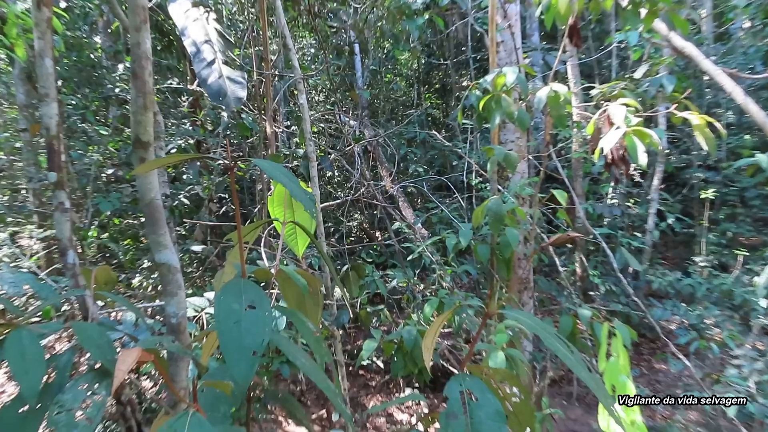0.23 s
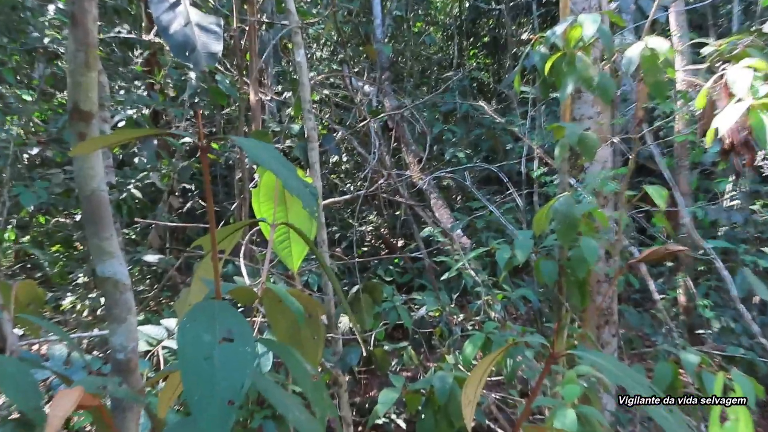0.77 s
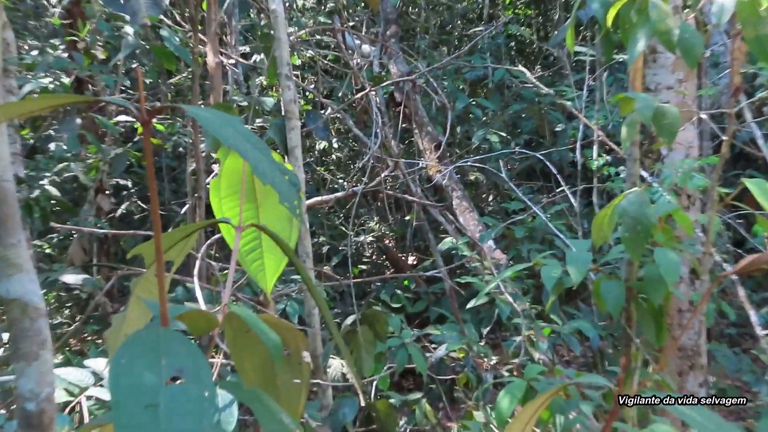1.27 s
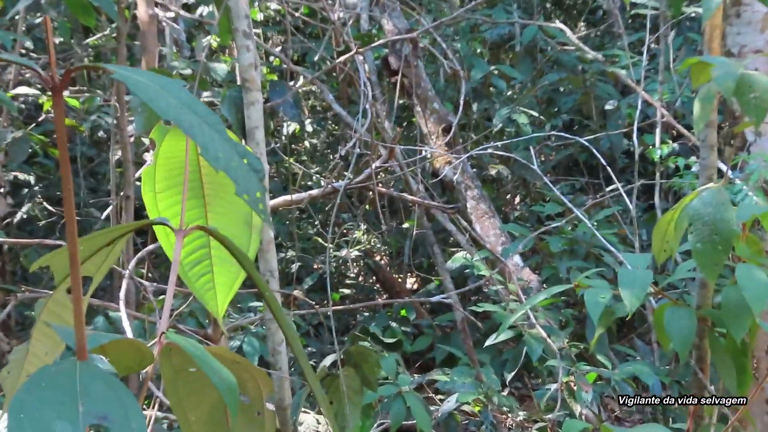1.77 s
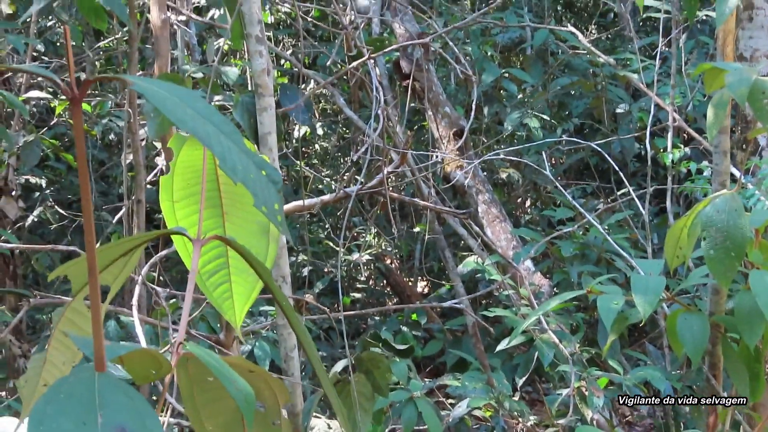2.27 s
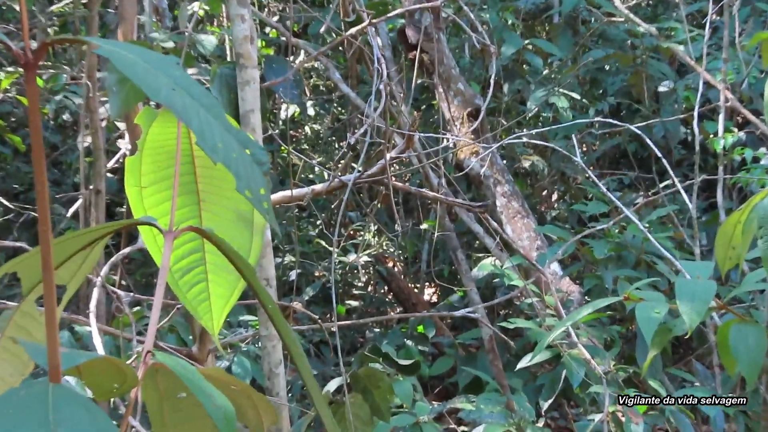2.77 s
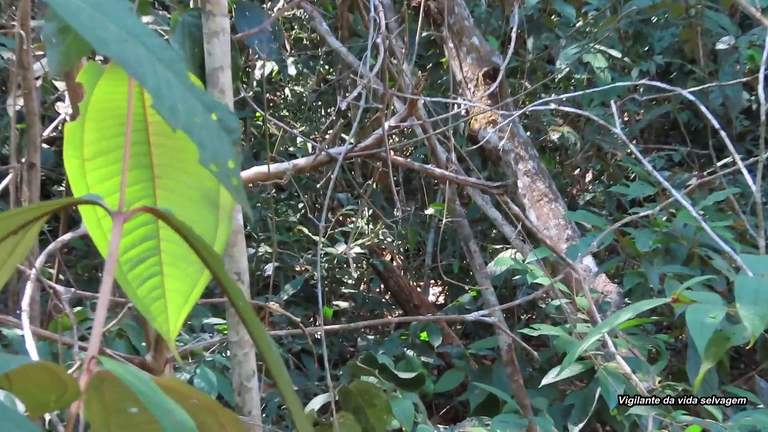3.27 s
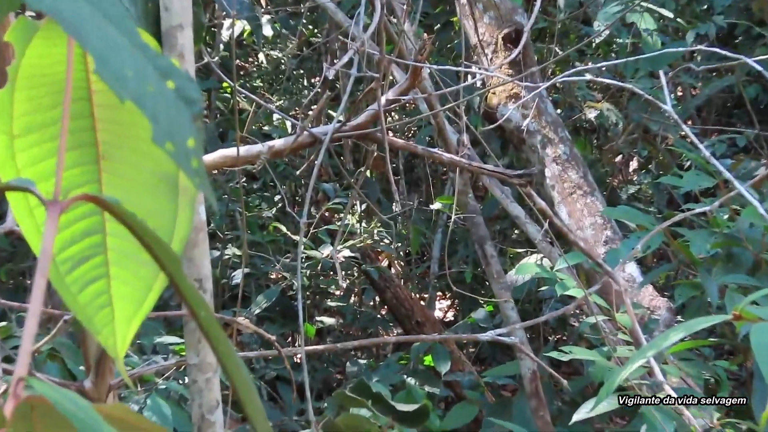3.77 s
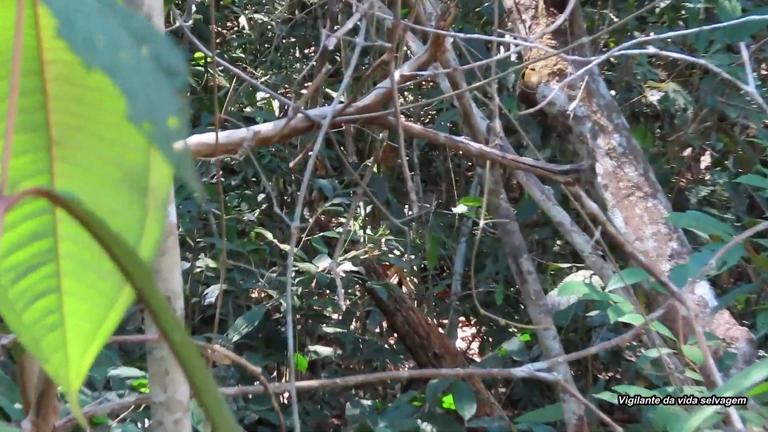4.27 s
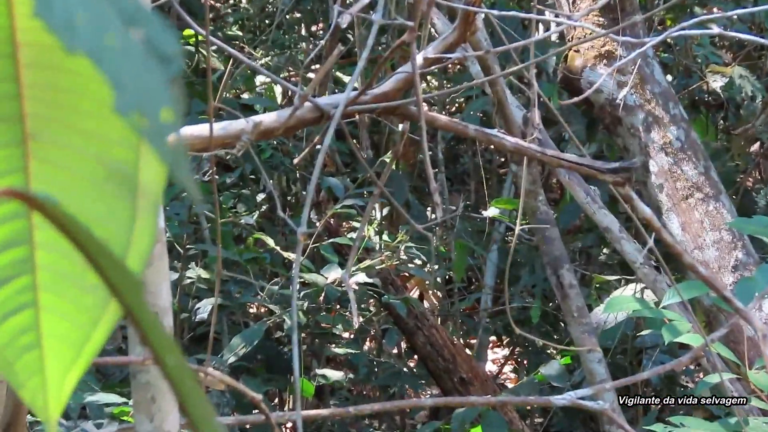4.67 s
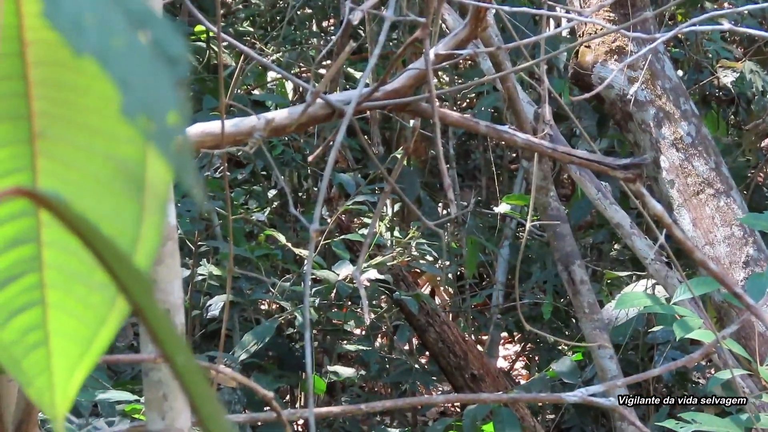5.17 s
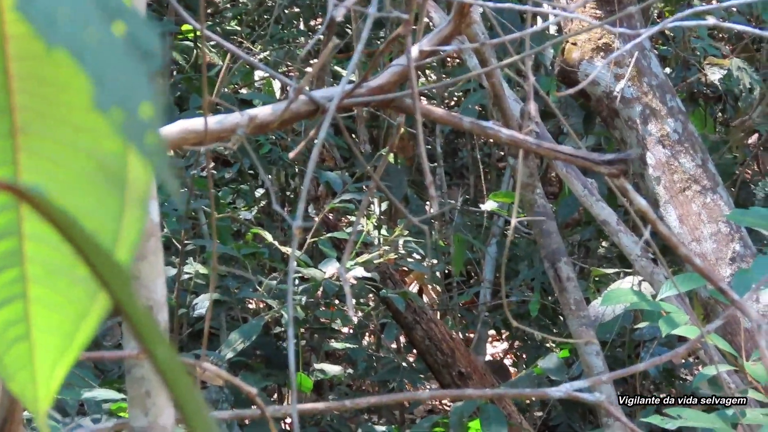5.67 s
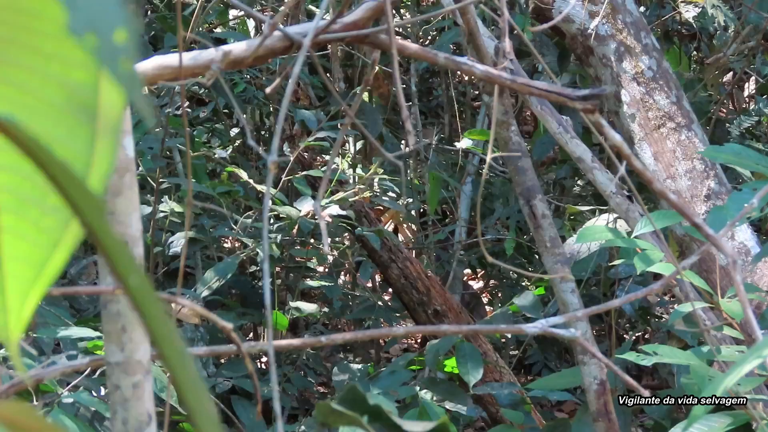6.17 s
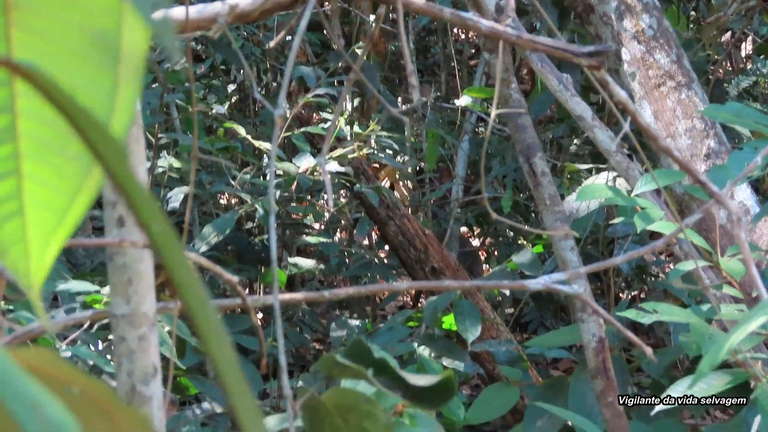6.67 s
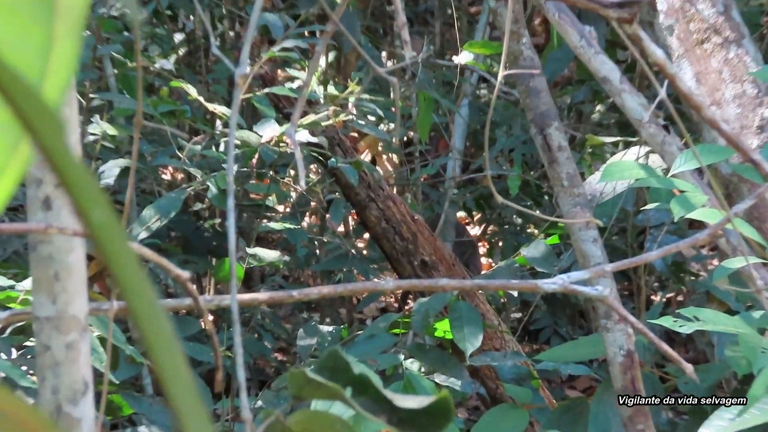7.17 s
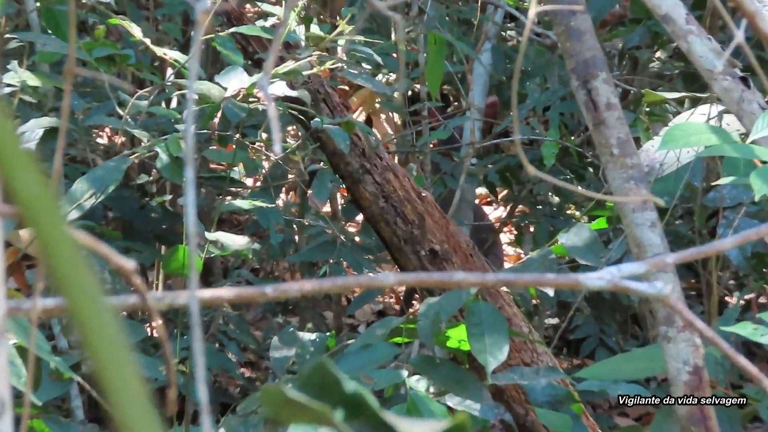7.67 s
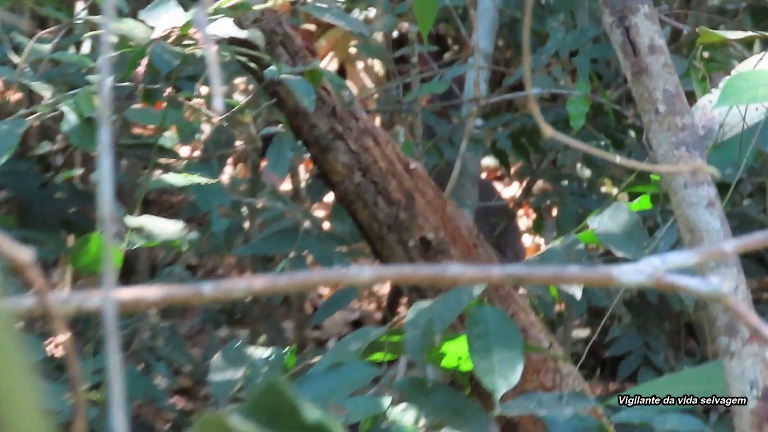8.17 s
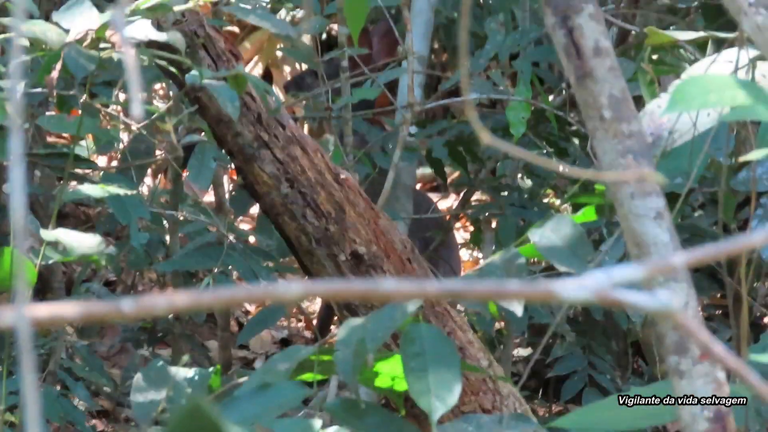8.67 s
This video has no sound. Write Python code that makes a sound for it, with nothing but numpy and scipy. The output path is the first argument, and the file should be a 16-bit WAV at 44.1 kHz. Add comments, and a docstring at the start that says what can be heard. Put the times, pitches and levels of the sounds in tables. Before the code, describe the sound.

Thin arched squeaks and short hoarse yaps from monkeys ring among trees, densest early, then sparser, with rustling foliage, insect shimmer and woody knocks.

```python
"""Spider monkeys call in a forest: thin, arched whistles, and sharp, falling chirps and yaps.
Whistles are near-sines with two overtones; the rougher calls are harmonics with unsteady phase.
Trunks throw the calls back and a few damped noise bursts knock on wood and leaves.
Leaf-like noise and ticks swell as rustle or as a dull, blurred echo of calls;
insects and a far bird sound over airy, low noise."""
import sys
import numpy as np
from scipy import signal
from scipy.fft import rfft, irfft, next_fast_len
from scipy.io import wavfile
from scipy.ndimage import uniform_filter1d

SR = 44100
rng = np.random.default_rng(int(sys.argv[2]) if len(sys.argv) > 2 else 0)


def to_wav(s):
    """Save 16-bit WAV."""
    ch = np.atleast_2d(s).T  # columns
    pcm = np.round(np.clip(ch, -1, 1) * 32767)  # PCM
    wavfile.write(sys.argv[1], SR, pcm.astype(np.int16))


N = 393372
EDGE_HZ = 15600  # upper band limit
CHIRP_MOUTH_HZ = 1197  # mouth resonance shared by chirps, squeals and yelps


def gain_of(db):
    """Decibels to amplitude."""
    return 10 ** (np.asarray(db) / 20)


def evened(x):
    """Scales to rms 1."""
    return x / np.sqrt(np.mean(x ** 2) + 1e-20)


def read(points, hz):
    """Reads a spectrum on a log-frequency axis."""
    f, value = np.transpose(points)
    return np.interp(np.log(hz + 1), np.log(f + 1), value)


def follow(rows, t):
    """Reads each column of a curve at the times t."""
    s, *columns = np.transpose(rows)
    return [np.interp(t, s, c) for c in columns]


def add(mix, s, sound):
    """Mixes a sound in at time s."""
    part = mix[max(round(s * SR), 0):][:len(sound)]
    part += sound[:len(part)]


def wander(size, rate_hz):
    """Chance drift around zero: straight lines between random knots, two knots per cycle of the rate."""
    knots = rng.standard_normal(8192)
    return 1.69 * np.interp(np.arange(size) * 2 * rate_hz / SR, np.arange(len(knots)), knots)


def fade(t, rise, fall):
    """Straight fade-in and fade-out, in seconds."""
    return np.clip((t - t[0]) / rise, 0, 1) * np.clip((t[-1] - t) / fall, 0, 1)


def noise(spectrum, patchy_db):
    """Stereo noise of a given colour, with patches that drift in time and frequency."""
    # left-right likeness: f/Hz, correlation (0-1)
    likeness = [(30, 0.66), (80, 0.96), (160, 0.51), (350, 0.14), (800, 0.93), (2000, 0.9), (5000, 0.92),
                (9000, 0.44), (15000, 0.39)]
    frames, hz = N // 256 + 5, np.fft.rfftfreq(1024, 1 / SR)
    a, b, c, d, patches = rng.standard_normal((5, frames, 513))
    patches = uniform_filter1d(patches, size=8, axis=0)
    patches = evened(uniform_filter1d(patches, size=14, axis=1))
    same = np.clip(read(likeness, hz), -1, 1)
    left = a + 1j * b
    right = same * left + np.sqrt(1 - same ** 2) * (c + 1j * d)
    z = np.array([left, right]) * gain_of(read(spectrum, hz) + patchy_db * patches)
    return evened(signal.istft(z.transpose(0, 2, 1), nperseg=1024, noverlap=768)[1][:, :N])


def air():
    """Steady, broad noise of the air, weighted to the lows."""
    # colour of the air: f/Hz, relative density/dB per Hz
    air_colour = [(12, -56), (20, 14.5), (85, 1.5), (109, 2), (180, 2.5), (282, -5), (324, -0.5), (404, 0),
                  (811, -2.5), (1500, -13.5), (2470, -8.5), (4070, -20), (6910, -26), (10500, -32),
                  (15500, -54)]
    return gain_of(-56.5) * noise(air_colour, patchy_db=4.0)


def rumble(t):
    """Low noise whose level rises and sinks."""
    # colour of the rumble: f/Hz, relative density/dB per Hz
    rumble_colour = [(30, -31), (70, -3), (120, -6), (250, -8), (450, -7.5), (560, -29.5), (1500, -56)]
    # course of the rumble: t/s, level/dB
    rumble_level = [(0, -46.5), (1.4, -47.5), (1.8, -41.5), (1.92, -51.5), (4.5, -49), (5.3, -52),
                    (6.2, -52.5), (7.2, -50), (7.7, -48), (8.9, -51.5)]
    return gain_of(follow(rumble_level, t)[0]) * noise(rumble_colour, patchy_db=2.5)


def swelling(t):
    """Levels in dB of leaf-like noise and dry hiss: each swell builds up, then settles to a faint stir."""
    # swells of leaf-like noise, some of them the dull, blurred echo of calls:
    # t/s at the height, settling time/s, leaf-like noise/dB, dry hiss/dB
    swells = [(2.22, .2, -41, -70), (2.51, 0.32, -39.5, -53), (3.625, 0.33, -43.5, -76),
              (4.303, .4, -51, -72), (4.925, 0.35, -42.5, -69), (5.681, 0.41, -43.5, -55),
              (5.93, 0.28, -41.5, -55), (6.102, 0.25, -44, -44.5), (6.39, 0.52, -43, -49.5),
              (6.732, 0.23, -43, -57), (7.557, 0.18, -42.5, -43.5), (8.118, 0.23, -45, -50),
              (8.338, 0.16, -44, -46.5), (8.6, 0.42, -42, -46)]
    rise_share = 0.71  # build-up time over settling time
    stir_db, dry_stir_db = -52, -64  # the stir between swells
    rustle, dry_hiss = gain_of(stir_db) ** 2, gain_of(dry_stir_db) ** 2
    for s, length, rustle_db, dry_db in swells:
        u = (t - s) / length
        power = np.exp(-2 * np.where(u < 0, (u / rise_share) ** 2, u))
        rustle = rustle + gain_of(rustle_db) ** 2 * power
        dry_hiss = dry_hiss + gain_of(dry_db) ** 2 * power
    return 10 * np.log10(rustle), 10 * np.log10(dry_hiss)


def leaf_noise(rustle_db, ticks_per_s=130, spread_db=1.0, ticks_db=-10):
    """Leaf-like rustle: a coloured noise wash with fine ticks of decaying noise."""
    # colour of the leaf-like noise: f/Hz, relative density/dB per Hz
    leaf_colour = [(120, -32), (200, -4.5), (330, -5), (520, -5), (700, -1), (900, -0.5), (1400, -2),
                   (2200, -4.5), (3400, -3.5), (5000, -7.5), (7000, -11.5), (11000, -24.5), (15500, -32.5)]
    strength_db = spread_db * np.minimum(rng.exponential(1, (2, N)), 4)
    clicks = (rng.random((2, N)) < ticks_per_s / SR) * gain_of(strength_db)
    clicks = clicks + .5 * clicks[::-1]  # each side also reaches the other ear
    grain = rng.standard_normal(200) * np.exp(-np.arange(200) / 35)
    ticks = signal.oaconvolve(clicks, grain[None], axes=1)[:, :N]
    size = next_fast_len(N)
    colour = gain_of(read(leaf_colour, np.fft.rfftfreq(size, 1 / SR)))
    ticks = irfft(rfft(ticks, size) * colour, size)[:, :N]
    level_db = rustle_db + 1.53 * wander(N, 15)
    return gain_of(level_db) * (noise(leaf_colour, patchy_db=2.5) + gain_of(ticks_db) * evened(ticks))


def dry_leaves(level_db):
    """Fine, flickering noise hiss of the nearest leaves."""
    # colour of dry leaves close by: f/Hz, relative density/dB per Hz
    fizz_colour = [(1500, -10), (3500, 0.5), (5500, 0.5), (8000, -6), (11000, -9), (15500, -18.5)]
    return gain_of(level_db + 1.1 * wander(N, 60)) * noise(fizz_colour, patchy_db=3.0)


def shrill(t, hz, width_hz):
    """An insect's narrow resonance, heard from all around: slow noise shifted up to its pitch."""
    b, a = signal.butter(2, width_hz / SR)
    i, q = signal.lfilter(b, a, rng.standard_normal((2, 2, N)))
    band = i * np.cos(2 * np.pi * hz * t) + q * np.sin(2 * np.pi * hz * t)
    return evened(band + 0.24 * band[::-1])


def insects(t):
    """A hissing cicada of narrow noise and a thin, wavering cricket tone that throbs unevenly."""
    # course of the insects: t/s, cicada level/dB, cricket level before its throbbing/dB
    insect_levels = [(0, -55, -51.5), (1.2, -56, -53), (1.7, -47.5, -46.5), (2.5, -45.5, -46.5),
                     (3.9, -47.5, -52.5), (4.1, -55, -50.5), (5.4, -60.5, -58), (7.2, -63, -61),
                     (8.9, -59, -64)]
    throb_hz, throb_db = 14, 6.5
    cicada_db, cricket_db = follow(insect_levels, t)
    cicada = gain_of(cicada_db) * shrill(t, hz=7060, width_hz=360)
    phase = 2 * np.pi * np.cumsum(3283 + 14 * wander(N, 60)) / SR
    throb = np.sin(2 * np.pi * np.cumsum(throb_hz * (1 + 0.22 * wander(N, 6))) / SR)
    cricket_db = cricket_db + throb_db * (throb - .5) + 1.5 * wander(N, 8)
    # phase drifts separately in each ear
    tone = np.array([np.sin(phase + 0.28 * wander(N, 25)) for _ in range(2)])
    return cicada + gain_of(cricket_db) * tone


def whistle(s, length, first_hz, crest_hz, last_hz, db, swell_db, octave_db,
            jitter=0.0022, shimmer_db=1.5, overtone_shimmer_db=3.0, third_db=-24):
    """A nearly pure, unsteady tone with two overtones; its pitch bends by a crest as it swells or dies."""
    crest, arch = 0.477, 2.067  # crest's place in the whistle (0-1); flatness of the arch's top
    bloom_s, bloom_db = 0.017, -8  # the overtones start this much weaker and come in over this time
    t = np.arange(0, length, 1 / SR)
    u = t / length
    end_hz = np.where(u < crest, first_hz, last_hz)
    from_crest = np.maximum(1 - u / crest, (u - crest) / (1 - crest))
    hz = crest_hz + (end_hz - crest_hz) * from_crest ** arch
    phase = 2 * np.pi * np.cumsum(hz * (1 + jitter * wander(len(t), 249))) / SR
    overtones = np.sin(2 * phase) + gain_of(third_db) * np.sin(3 * phase)
    overtone_db = octave_db + bloom_db * np.exp(-t / bloom_s) + overtone_shimmer_db * wander(len(t), 50)
    tone = np.sin(phase) + gain_of(overtone_db) * overtones
    level_db = db + swell_db * (u - .5) + shimmer_db * wander(len(t), 70.0)
    return s, np.sqrt(2) * gain_of(level_db) * tone * fade(t, 0.0085, 0.0029)


def far_bird():
    """Two faint, sagging notes, made as soft whistles."""
    # bird notes: t/s, length/s, first f/Hz, crest f/Hz, last f/Hz, level/dB,
    # swell from start to end/dB, octave against the fundamental/dB
    bird_notes = [(0, .17, 2467, 2450, 2420, -53.5, 1, -30), (.28, 0.18, 2620, 2540, 2310, -53, -4, -30)]
    mix = np.zeros(N)
    for row in bird_notes:
        add(mix, *whistle(*row))
    return mix


def forest(x, near_db=-10, near_t60=0.13, far_db=-11):
    """Single echoes from near trunks, quick scatter from leaves, and a long tail from trees beyond."""
    # first trunk echoes: delay/s, level/dB
    trunks = [(0.0091, -10), (0.019, -11), (0.032, -15), (0.057, -19.5)]
    # colour of the far echoes: f/Hz, relative level/dB
    tail_colour = [(500, -5.5), (720, -5), (870, -5), (1020, -0.5), (1200, 3), (1500, -14.5), (1850, 4.5),
                   (3000, 1), (4500, 4), (5700, 2.5), (7000, 0), (8800, 1.5), (14000, -16)]
    # decay of the far echoes: f/Hz, t60/s
    tail_t60 = [(200, 0.72), (900, 0.58), (2000, 0.82), (4500, 0.66), (8000, 0.68), (14000, 0.14)]
    # echoes, side against middle: f/Hz, level/dB
    spread = [(500, -26), (2000, -12.5), (4500, -8), (6500, -5), (8500, 0.5), (14000, 9)]
    taps = rng.standard_normal((2, SR)) * (rng.random((2, SR)) < 500 / SR)  # 500 far echoes a second
    hz, t, z = signal.stft(taps, SR, nperseg=256)
    tail_db = read(tail_colour, hz)[:, None] - 60 * t / read(tail_t60, hz)[:, None]
    far = signal.istft(z * gain_of(tail_db), SR, nperseg=256)[1][:, :SR]
    t = np.arange(SR) / SR
    far *= np.clip(t / 0.029, 0, 1)
    near = rng.standard_normal((2, SR)) * gain_of(-60 * t / near_t60) * (t > .003)
    far *= gain_of(far_db) / np.linalg.norm(far[0])
    near *= gain_of(near_db) / np.linalg.norm(near[0])
    mid, side = far + near
    for delay, db in trunks:
        mid[round(delay * SR)] += gain_of(db)
    # close microphones differ most in the treble
    side = irfft(rfft(side) * gain_of(read(spread, np.fft.rfftfreq(SR, 1 / SR))), SR)
    return signal.fftconvolve(x[None], np.array([mid + side, mid - side]), axes=1)[:, :N]


def whistles():
    """The monkeys' thin whistles and short squeaks: near-sines with a bent pitch."""
    # whistles: t/s, length/s, first f/Hz, crest f/Hz, last f/Hz, level before the 1.5 dB trim below/dB,
    # swell from start to end/dB, octave against the fundamental/dB
    whistle_rows = [(0.153, .085, 3860, 4390, 4410, -27, 10.5, -13),
                    (0.389, 0.13, 4330, 4389, 4460, -23.5, 1, -14),
                    (0.787, 0.033, 4340, 4356, 4310, -38.5, -3, -15),
                    (0.826, 0.087, 4317, 4360, 4400, -29.5, -14, -10.5),
                    (0.936, 0.044, 4370, 4362, 4350, -33.5, -4, -19),
                    (1.409, .022, 4080, 4166, 4210, -38, -2, -14),
                    (1.427, .083, 4334, 4520, 4365, -22, 3.5, -13),
                    (1.693, .036, 4140, 4210, 4340, -41, 2, -6),
                    (1.722, 0.042, 4286, 4385, 4440, -25.5, 1, -10.5),
                    (1.993, 0.095, 4150, 4327, 4351, -27.5, 17, -10),
                    (2.287, 0.029, 2920, 3130, 3320, -35, -4, -18),
                    (2.315, 0.066, 3860, 3714, 3930, -29, -4, -7.5),
                    (2.388, 0.069, 3900, 4130, 4350, -34, 1, -5.5),
                    (2.753, 0.066, 4010, 4213, 4220, -30.5, -3, -13),
                    (2.959, 0.098, 6110, 6110, 5730, -30, 2.5, -20),
                    (3.305, 0.054, 5640, 5710, 5400, -39, 9, -17.5),
                    (3.437, 0.038, 4240, 4050, 2950, -38.5, 6, -27),
                    (4.096, .126, 3830, 4276, 3977, -26.5, -1.5, -8),
                    (4.397, .017, 2930, 3043, 3120, -24, 0, -7.5),
                    (4.414, 0.12, 4070, 3944, 3950, -39, -5, -16),
                    (4.752, 0.0207, 2600, 2910, 3050, -29.5, -2, -16),
                    (4.79, .013, 2980, 2840, 2600, -26.5, 0, -13),
                    (6.083, 0.062, 3830, 4196, 4134, -23.5, -5, -8.5),
                    (6.415, 0.11, 4150, 4345, 4257, -30.5, 9.5, -10),
                    (6.72, 0.069, 4230, 4110, 4060, -35.5, 9, -19),
                    (7.337, .092, 4140, 4230, 4140, -38, 4, -27)]
    mix = np.zeros(N)
    for row in whistle_rows:
        add(mix, *whistle(*row))
    return gain_of(-1.5) * mix


def throat_call(s, length, first_hz, last_hz, lateness, mouth_hz, low_db, high_db, tilt_db, rough,
                jitter=0.078, shimmer_db=5, mouth_db=10, mouth_width_hz=130, notch_db=7,
                rasp=0.63, settle=0.607):
    """Harmonics glide and roughen; the fundamental flares as it crosses the mouth's resonance."""
    # throat colour of the overtones: f/Hz, relative level/dB
    throat = [(1400, -11), (1900, -3.5), (2500, -12), (3200, 4), (4000, 2.5), (4900, 5), (5500, 3.5),
              (6000, 6), (6900, 4.5), (7900, -0.5), (9500, -17.5), (11500, -19.5), (15000, -59)]
    t = np.arange(0, length, 1 / SR)
    glide = (t / length) ** lateness
    glide += settle * glide * (1 - glide)  # the glide slows near its end
    unrest = rough * (0.17 + 1.71 * glide)
    hz = (first_hz + (last_hz - first_hz) * glide) * (1 + jitter * unrest * wander(len(t), 852))
    phase = 2 * np.pi * np.cumsum(hz) / SR
    overtones = np.zeros(len(t))
    for k in range(2, 14):
        smear = rasp * k * unrest * wander(len(t), 500.0)  # uneven cycles blur the high harmonics most
        level_db = tilt_db * np.log2(k) + shimmer_db * np.sqrt(unrest) * wander(len(t), 221.5)
        harmonic = np.sin(k * phase + smear + rng.uniform(0, 2 * np.pi))
        overtones += gain_of(level_db) * (k * hz < EDGE_HZ) * harmonic
    throat_gain = gain_of(read(throat, np.fft.rfftfreq(8192, 1 / SR)))
    overtones = irfft(rfft(overtones, 8192) * throat_gain)[:len(t)]
    # the effort arches and gives out along the glide
    overtones *= gain_of(4.2 * np.sin(np.pi * t / length) - 9.4 * glide)
    flare = mouth_db / (1 + ((hz - mouth_hz) / mouth_width_hz) ** 2)
    hollow = notch_db / (1 + ((hz - 1560) / 170) ** 2)  # valley above the mouth's resonance
    fundamental = np.sin(phase) * gain_of(flare - hollow)
    voice = gain_of(low_db) * evened(fundamental) + gain_of(high_db) * evened(overtones)
    return s, voice * fade(t, 0.0017, 0.0032)


def squeals():
    """Throat calls whose pitch only sags."""
    # squeals: t/s, length/s, first f/Hz, fundamental/dB, overtones/dB, overtone tilt/dB per octave
    squeal_rows = [(.23, .009, 2050, -58, -42, -12), (.525, 0.0083, 2050, -59, -27.5, -6),
                   (0.908, 0.0163, 2067, -63, -33.5, -29), (2.587, 0.052, 2477, -49.5, -34, -5),
                   (3.106, 0.0236, 2560, -33, -42, -23)]
    mix = np.zeros(N)
    for s, length, hz, low_db, high_db, tilt_db in squeal_rows:
        add(mix, *throat_call(s, length, hz, hz * 0.93, 0.96, CHIRP_MOUTH_HZ,
                              low_db, high_db, tilt_db, rough=0.21))
    return mix


def chirps():
    """Sharp throat calls that plunge to one pitch; longer ones hold longer before the plunge."""
    # chirps: t/s, length/s, first f/Hz, fundamental/dB, overtones/dB, overtone tilt/dB per octave,
    # roughness (0-1)
    chirp_rows = [(.532, 0.016, 1735, -33.5, -29.5, 1, .5), (.917, .011, 1788, -33, -36, -2, 0.25),
                  (1.507, .02, 2070, -29, -24, -0.5, 0.44), (1.758, 0.059, 2462, -28.5, -19, -2.5, .22),
                  (2.094, .027, 2382, -26.5, -20.5, 2, 0.3), (2.514, 0.018, 2146, -42, -35, -6, 0.49),
                  (2.827, .016, 1896, -26, -23.5, -2, 0.61), (4.222, 0.013, 1464, -25, -25.5, -2, 0.25),
                  (4.516, 0.0065, 1330, -31.5, -20, 0.5, 0.58), (4.521, .049, 2307, -27.5, -19, -1.5, 0.27),
                  (4.798, 0.019, 1486, -30, -31.5, -9, .65), (6.141, .014, 1640, -28, -34.5, -10, .53),
                  (6.796, 0.018, 1640, -30.5, -29, -3.5, 0.47), (7.427, .013, 1547, -30.5, -31, -6, 0.33)]
    end_hz, plunge_s = 1007, .0115
    mix = np.zeros(N)
    for s, length, hz, low_db, high_db, tilt_db, rough in chirp_rows:
        lateness = max(length / plunge_s, 1)
        add(mix, *throat_call(s, length, hz, end_hz, lateness, CHIRP_MOUTH_HZ,
                              low_db, high_db, tilt_db, rough))
    return mix


def yaps():
    """Low, hoarse, falling throat calls; the mouth's resonance scales with the first pitch."""
    # yaps: t/s, length/s, first f/Hz, fundamental/dB, overtones/dB, overtone tilt/dB per octave,
    # roughness (0 is smooth, about 1 is hoarsest)
    yap_rows = [(1.034, 0.01, 1014, -21.5, -38.5, -26, 0.56), (1.042, 0.02, 903, -46, -40.5, -24, 1.12),
                (2.137, 0.019, 1183, -28, -25, -32, 0.35), (2.15, 0.015, 1010, -16, -23, -17.5, 0.37),
                (2.798, .035, 1058, -35, -37, -17, 0.9), (2.837, 0.017, 793, -38.5, -38, -16, 0.74),
                (3.133, 0.0151, 1261, -26, -32, -4.5, 0.54), (3.362, 0.018, 1170, -35, -36, -7, 0.97),
                (3.467, 0.0162, 1090, -29.5, -32.5, -22, 0.63), (3.484, 0.017, 754, -38.5, -43, -15, 1.1),
                (5.528, .021, 1000, -34, -35, -39, 0.74), (7.584, 0.011, 1258, -39, -35.5, -19, .9)]
    last_ratio, mouth_ratio = .69, 0.834  # last pitch and mouth resonance over first pitch
    mix = np.zeros(N)
    for s, length, hz, low_db, high_db, tilt_db, rough in yap_rows:
        add(mix, *throat_call(s, length, hz, hz * last_ratio, 0.99, hz * mouth_ratio,
                              low_db, high_db, tilt_db, rough))
    return mix


def knock(s, db, centre_hz, octaves, decay):
    """A short, damped noise burst in one broad resonance."""
    t, hz = np.arange(8192) / SR, np.fft.rfftfreq(8192, 1 / SR)
    colour = np.exp(-.5 * (np.log2((hz + 1) / centre_hz) / octaves) ** 2)
    burst = evened(irfft(colour * rfft(rng.standard_normal(len(t)))))
    return s, gain_of(db) * burst * np.exp(-t / decay) * fade(t, 0.00046, 0.028)


def knocks():
    """Knocks on wood and leaves, several of them built from overlapping damped bursts."""
    # bursts: t/s, level before decay/dB, centre f/Hz, width/octaves, decay/s
    knock_rows = [(6.4511, -19, 1100, 0.35, 0.0064), (6.455, -26.5, 297, 1.12, 0.036),
                  (6.463, -38, 930, 1, 0.011), (6.471, -21, 1700, 1.02, 0.0083),
                  (6.485, -33.5, 3200, 0.81, 0.081), (6.509, -23, 4100, 0.53, 0.0068),
                  (6.518, -24.5, 1300, 0.15, 0.0037), (6.565, -36.5, 510, 1.2, 0.023),
                  (3.7, -39, 5000, 0.55, 0.0036), (7.291, -39, 1750, 1.26, 0.0093),
                  (8.396, -19.5, 1530, 0.93, 0.0024), (8.40, -32, 596, 0.16, 0.013),
                  (8.392, -37.5, 304, 0.41, .015), (7.586, -27.5, 1400, 0.37, 0.0076)]
    mix = np.zeros(N)
    for row in knock_rows:
        add(mix, *knock(*row))
    return mix


def yelps():
    """Rough throat calls that glide upward into the low whistles."""
    # yelps: t/s, length/s, fundamental/dB, overtones/dB
    yelp_rows = [(4.382, .025, -39.5, -40), (4.743, 0.0157, -44, -50)]
    from_hz, to_hz = 1090, 1954
    mix = np.zeros(N)
    for s, length, low_db, high_db in yelp_rows:
        add(mix, *throat_call(s, length, from_hz, to_hz, 1, CHIRP_MOUTH_HZ,
                              low_db, high_db, tilt_db=-10, rough=0.46))
    return mix


def scene():
    """Calls and knocks straight ahead, the forest all around."""
    t = np.arange(N) / SR
    rustle_db, dry_db = swelling(t)
    around = air() + rumble(t) + leaf_noise(rustle_db) + dry_leaves(dry_db) + insects(t)
    monkeys = whistles() + squeals() + chirps() + yaps() + yelps()
    ahead = far_bird() + monkeys + knocks()
    return ahead + forest(ahead) + around


def record(dry):
    """The recorder's band limit: a steep low-pass."""
    low_pass = signal.firwin(511, EDGE_HZ, window=("kaiser", 9), fs=SR)
    return signal.oaconvolve(dry, low_pass[None], "same")


dry = scene()
out = record(dry)
to_wav(out)
```